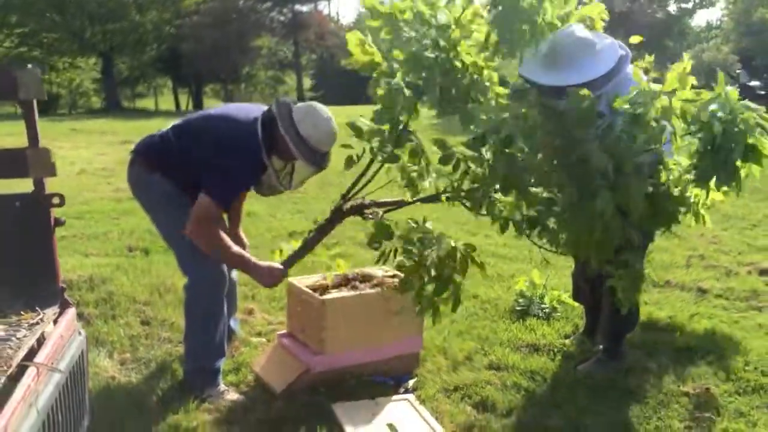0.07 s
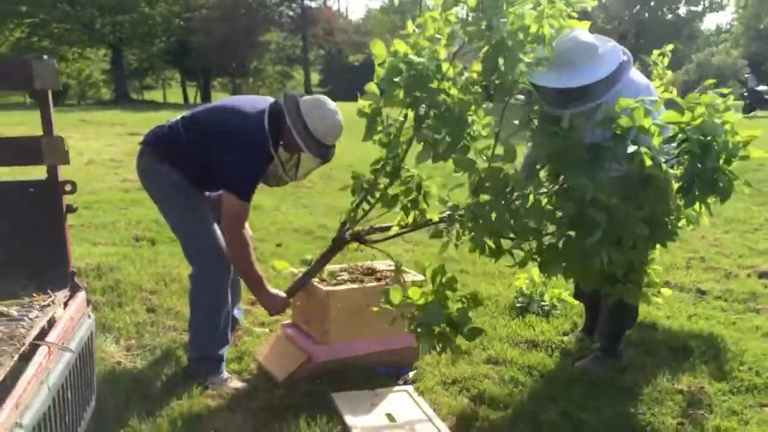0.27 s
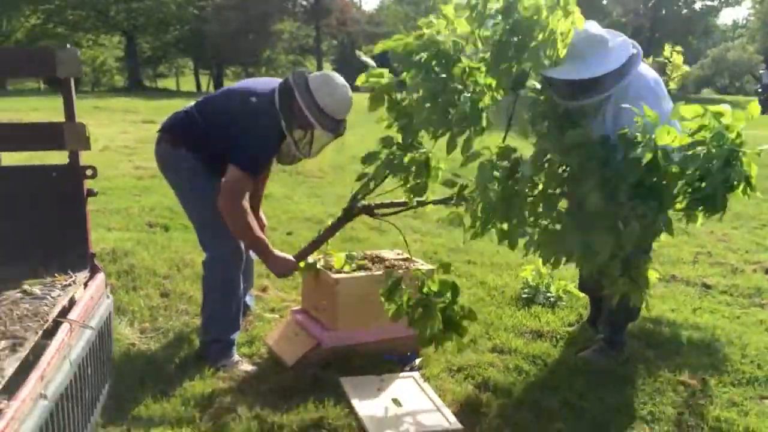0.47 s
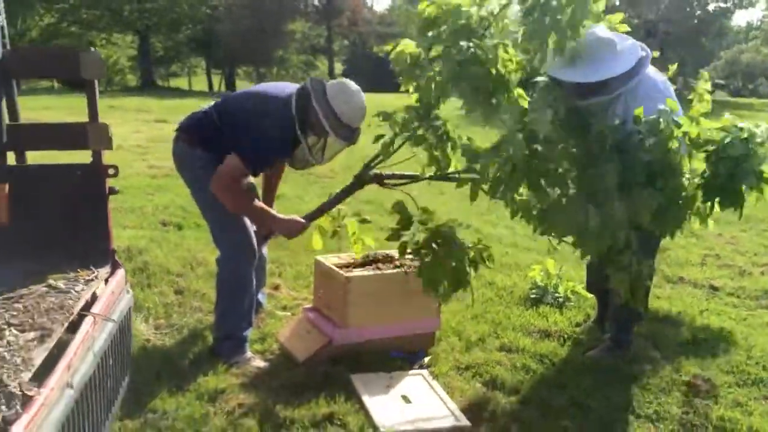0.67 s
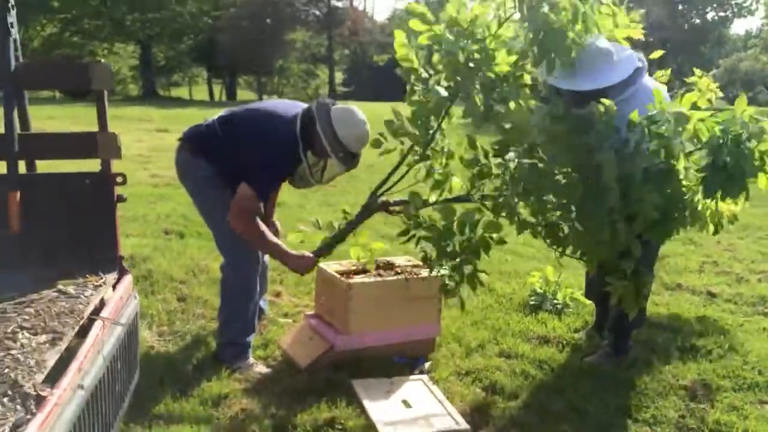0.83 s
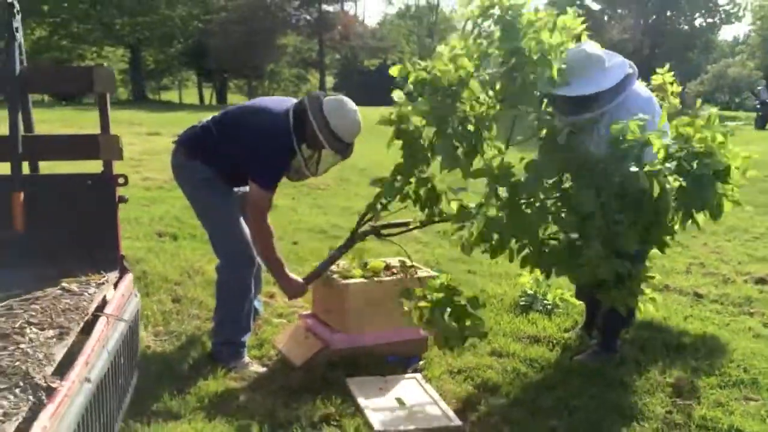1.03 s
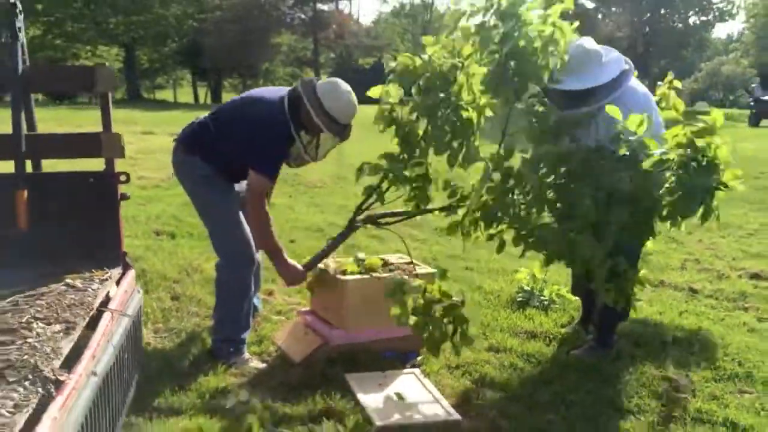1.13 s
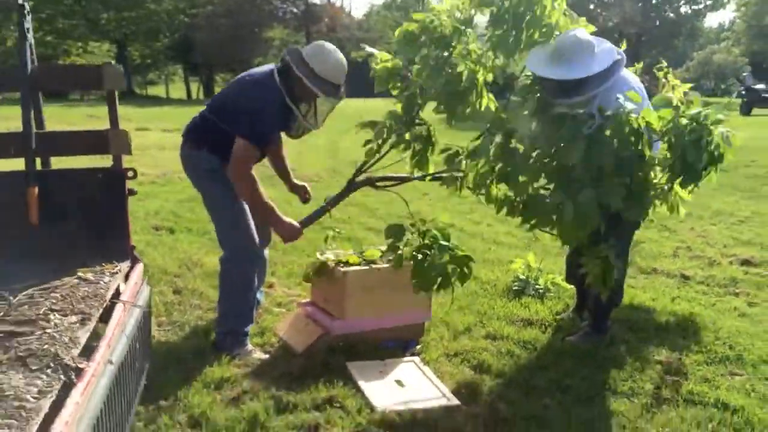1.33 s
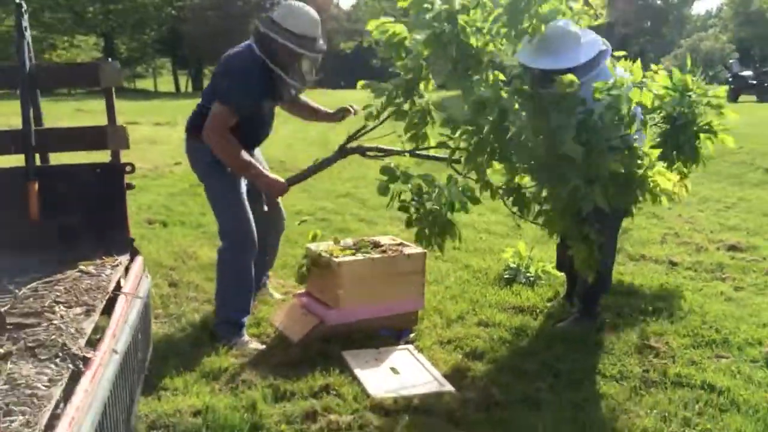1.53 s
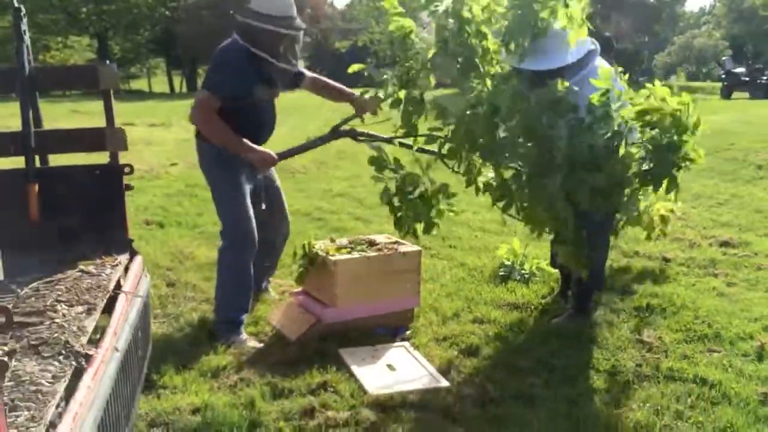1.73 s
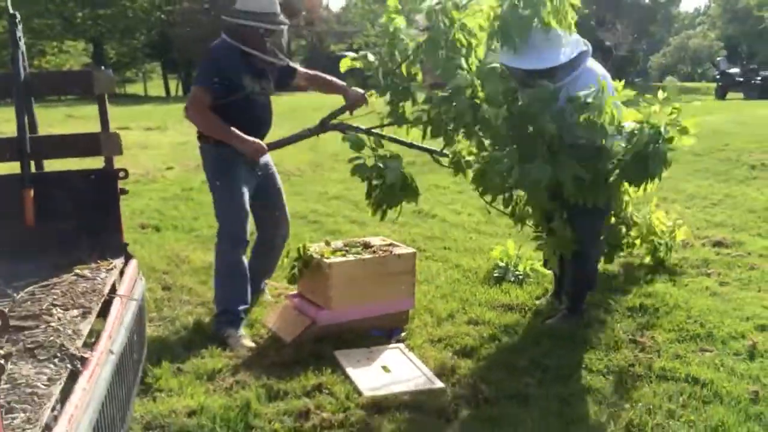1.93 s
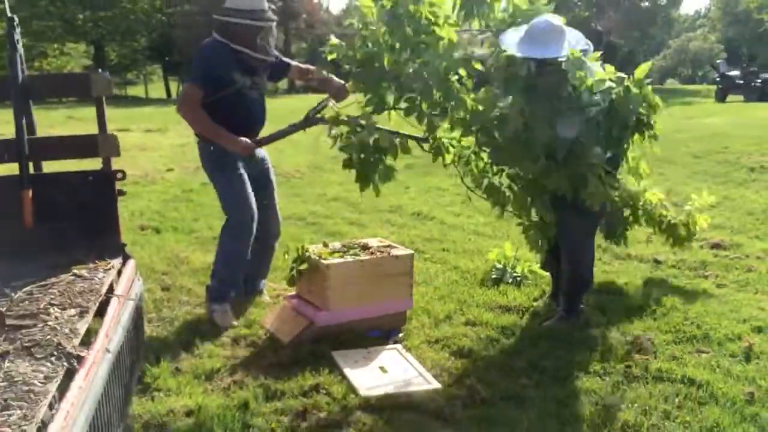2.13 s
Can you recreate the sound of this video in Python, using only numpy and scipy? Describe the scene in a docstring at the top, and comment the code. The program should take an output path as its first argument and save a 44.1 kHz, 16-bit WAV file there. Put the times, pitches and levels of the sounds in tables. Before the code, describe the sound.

Two loud hollow knocks of a branch on a wooden box, clipping, in quiet open air

```python
"""An open lawn: a leafy branch is knocked twice on a wooden hive box to shake a swarm off.
Each blow is shaped noise (tick, crack, clatter, leaves) over the ringing sine modes of the box.
The branch chatters and rings just after; a dull echo and a low scatter of noise return.
Around the blows: coloured noise for air, puffs of wind and twig ticks, and one gliding sine as a bird.
The blows overload the microphone, which clips them."""
import sys
import numpy as np
from scipy import signal
from scipy.fft import rfft, irfft
from scipy.io import wavfile
from scipy.ndimage import uniform_filter1d

SR = 44100
rng = np.random.default_rng(int(sys.argv[2]) if len(sys.argv) > 2 else 0)


def master_out(mix):
    """Clip the mix to full scale and print it as 16-bit PCM to the path in sys.argv[1]."""
    frames = np.transpose(np.atleast_2d(mix))
    ceiling = np.clip(frames, -1, 1)
    pcm = np.round(ceiling * 32767).astype(np.int16)
    wavfile.write(sys.argv[1], SR, pcm)


N = 97020
TIME = np.arange(N) / SR

# the two blows: start_s, thump_hz, boom_db, crack_db, clatter_db, leaves_db
KNOCKS = [(0.2464, 238.5, -1.5, -12.5, -12, -36), (0.9955, 237.7, 0.5, -10, -17, -37.5)]
# relative spectrum of loose wood rattling: pitch_hz, level_db (per Hz)
CLATTER_COLOUR = [(30, -8), (130, -45), (300, -2), (560, -5), (1050, -3.5), (1450, -11), (2200, -11),
                  (2900, -27.5), (4400, -26.5), (6000, -36), (15500, -50)]


def amp(db):
    """Decibels to gain."""
    return 10 ** (np.asarray(db) / 20)


def unit(x):
    """Scales to rms 1."""
    return x / np.sqrt(np.mean(x ** 2) + 1e-20)


def gains(points, hz):
    """Reads a spectrum on a log-frequency axis."""
    point_hz, point_db = np.transpose(points)
    return amp(np.interp(np.log(hz + 1), np.log(point_hz + 1), point_db))


def noise(points, grain_db=0):
    """Noise of a given colour and rms 1; uneven sample sizes make it gritty."""
    grain = amp(grain_db * np.minimum(rng.exponential(1, N), 5))
    white = rng.standard_normal(N) * grain
    colour = gains(points, np.fft.rfftfreq(N, 1 / SR))
    return unit(irfft(rfft(white) * colour, N))


def burst(start_s, rise_s, t60_s):
    """A linear rise, then an exponential decay of 60 dB in t60_s."""
    t = np.maximum(TIME - start_s, 0)
    rise = np.minimum(t / rise_s, 1)
    return rise * amp(-60 * np.maximum(t - rise_s, 0) / t60_s)


def swells(rows):
    """Bell-shaped swells (peak_s, level_db, bell width as one sigma in s), added in power."""
    power = 0
    for peak_s, level_db, width_s in rows:
        bell = np.exp(-((TIME - peak_s) / width_s) ** 2 / 2)
        power = power + (amp(level_db) * bell) ** 2
    return np.sqrt(power)


def band(x, low_hz, top_hz):
    """A gentle band-pass."""
    edges_hz = [low_hz, min(top_hz, .49 * SR)]
    return signal.sosfilt(signal.butter(2, edges_hz, "band", fs=SR, output="sos"), x)


def air():
    """Outdoor air: broad noise with faint patches drifting in time and pitch, and a slow level ride."""
    # relative spectrum of the air: pitch_hz, level_db (per Hz)
    air_colour = [(15, -40), (25, -22), (54, -3), (196, 0.5), (286, -10), (462, -9), (637, -15), (790, -10),
                  (1150, -13.5), (1580, -15.5), (2630, -22), (3090, -20.5), (5570, -24), (6900, -25),
                  (15000, -29.5)]
    # relative level of the background: time_s, level_db
    air_level = [(0, 2), (.3, -1), (.6, 0), (.9, 0.5), (1.24, -2.5), (1.36, 2), (1.55, 0), (1.75, -1),
                 (1.95, -1), (2.2, -3.5)]
    level_db, patch_db = -44.5, 1.5
    spectrum = signal.stft(noise(air_colour), nperseg=1024, noverlap=768)[2]
    patches = rng.standard_normal(spectrum.shape)
    for axis in (0, 1):  # smooth over pitch, then over time
        patches = uniform_filter1d(patches, size=20, axis=axis)
    patchy = spectrum * amp(patch_db * unit(patches))
    steady = unit(signal.istft(patchy, nperseg=1024, noverlap=768)[1][:N])
    ride = amp(np.interp(TIME, *np.transpose(air_level)))
    return amp(level_db) * steady * ride


def bird(bend=0.83):
    """One faint rising chirp, a gliding sine blurred by a decaying noise reverb from the trees."""
    start_s, length_s, level_db = .002, .1, -52
    from_hz, to_hz = 2720, 3330
    blur_db, blur_rise_s, blur_t60_s = 1, 0.017, 0.41
    progress = np.clip((TIME - start_s) / length_s, 0, 1)
    hz = from_hz + (to_hz - from_hz) * progress ** bend
    tone = np.sin(2 * np.pi * np.cumsum(hz) / SR)
    chirp = amp(level_db) * np.sin(np.pi * progress) ** 2 * tone
    trees = rng.standard_normal(N) * burst(0, blur_rise_s, blur_t60_s)
    blurred = signal.fftconvolve(chirp, trees / np.linalg.norm(trees))[:N]
    return chirp + amp(blur_db) * blurred


def wind():
    """Puffs of wind on the microphone: low rumbling noise in bell-shaped swells."""
    # relative spectrum of the rumble: pitch_hz, level_db (per Hz)
    wind_colour = [(20, -30), (45, -4.5), (65, 1.5), (100, -3), (150, -5.5), (250, -22.5), (400, -43),
                   (1500, -42), (15500, -94)]
    # puffs: peak_s, level_db, width_s (one sigma)
    puffs = [(0.185, -43, 0.033), (1.2, -50.5, 0.056), (1.362, -38.5, 0.017), (1.43, -36.5, 0.03),
             (1.58, -49, 0.1), (2.022, -34, 0.0076), (2.076, -22, 0.02), (2.125, -35, 0.02),
             (2.19, -23.5, 0.014)]
    return noise(wind_colour) * swells(puffs)


def leaves():
    """Bright noise: leaves shiver after each blow and rustle as the branch is swung and lifted."""
    # relative spectrum of the leaves: pitch_hz, level_db (per Hz)
    leaf_colour = [(100, -2), (1000, 13), (2300, 8.5), (4200, 9.5), (7000, 5), (11000, 4), (15500, 5)]
    # rustles of the moving branch: peak_s, level_db, width_s (one sigma)
    rustles = [(0.21, -50.5, 0.053), (0.63, -50, 0.073), (0.985, -44, 0.011), (1.34, -48.5, 0.024),
               (1.435, -48.5, 0.019), (2.1, -46.5, 0.091)]
    rise_s, t60_s = .004, 0.7
    shiver = sum(amp(leaves_db) * burst(start_s, rise_s, t60_s) for start_s, *_, leaves_db in KNOCKS)
    return noise(leaf_colour, grain_db=2.5) * np.hypot(shiver, swells(rustles))


def boom(start_s, thump_hz, place):
    """The box flexes for a few heavy cycles and its modes ring; low ones take longer to build up."""
    # modes of the box struck at two places: pitch_hz, t60_s, first_knock_db, second_knock_db
    box_modes = [(95, .06, -11, -38), (180, 0.081, 1, -6), (203.1, 0.14, 1, -7.5), (245.7, 0.072, -1, -1),
                 (324, 0.047, -32.5, -5.5), (354.5, 0.062, -2, -9.5), (488, 0.1, -11, -16),
                 (740.5, 0.15, -17.5, -15.5), (813.4, 0.041, -32, -5), (1044, 0.12, -24, -14.5),
                 (1245, 0.11, -17.5, -22), (1620, 0.076, -20, -28), (1731, 0.07, -15, -34),
                 (1872, 0.067, -19, -22.5)]
    rise_s, contact_cycles = 0.0021, 0.59
    low_db, low_hz, low_fade_s, low_lead_s = -2.5, 173, 0.0041, .001
    thump_db, thump_delay_s, thump_width_s = -2.5, 0.0068, 0.0024
    t = TIME - start_s
    # a short low swell around the moment of contact
    low_envelope = np.exp(-abs(t + low_lead_s) / low_fade_s)
    low_swell = amp(low_db) * low_envelope * np.sin(2 * np.pi * low_hz * t)
    # the first heavy flex of the box
    flex = swells([(start_s + thump_delay_s, thump_db, thump_width_s)])
    out = low_swell + flex * np.sin(2 * np.pi * thump_hz * t)
    for hz, t60_s, *levels_db in box_modes:
        ring = burst(start_s, rise_s + contact_cycles / hz, t60_s)
        out += amp(levels_db[place]) * ring * np.sin(2 * np.pi * hz * t)
    return out


def knocks():
    """Each blow: a bright tick of bark, a crack, the boom of the box and a clatter of loose wood."""
    # relative spectrum of the bark tick: pitch_hz, level_db (per Hz)
    tick_colour = [(100, -15), (1500, -13), (3400, 4), (5000, -4.5), (6500, -1.5), (10000, -9),
                   (15500, -22)]
    # relative spectrum of the crack: pitch_hz, level_db (per Hz)
    crack_colour = [(100, -25), (500, 3.5), (1200, 2.5), (2100, 10), (3000, -28), (4700, 1), (6000, -14.5),
                    (10000, -21), (15500, -34)]
    tick_db, tick_lead_s, tick_rise_s, tick_t60_s = -19, 0.00203, 0.00037, 0.018
    crack_lead_s, crack_rise_s, crack_t60_s = 0.00096, .0012, 0.024
    clatter_rise_s, clatter_t60_s = 0.0083, 0.13
    tick, crack = noise(tick_colour), noise(crack_colour)
    clatter = noise(CLATTER_COLOUR, grain_db=2)
    out = np.zeros(N)
    for place, (start_s, thump_hz, boom_db, crack_db, clatter_db, _) in enumerate(KNOCKS):
        out += amp(tick_db) * tick * burst(start_s - tick_lead_s, tick_rise_s, tick_t60_s)
        out += amp(crack_db) * crack * burst(start_s - crack_lead_s, crack_rise_s, crack_t60_s)
        out += amp(boom_db) * boom(start_s, thump_hz, place)
        out += amp(clatter_db) * clatter * burst(start_s, clatter_rise_s, clatter_t60_s)
    return out


def rebounds(rise_s=0.00047):
    """The branch chatters on the rim of the box just after each blow, and its own modes ring."""
    # landings of the branch: start_s, clatter_db, bark_snap_db, branch_ring_db
    landings = [(0.2623, -18.5, -24.5, -44), (0.2704, -16, -21.5, -34), (1.0176, -21, -16.5, -23),
                (1.0227, -24.5, -43, -41)]
    # relative spectrum of the bark snap: pitch_hz, level_db (per Hz)
    snap_colour = [(200, -5), (1200, 13.5), (2400, 0), (2900, -6), (3480, 1), (3750, -1.5), (4500, -5),
                   (5500, -11.5), (9000, -17.5), (15500, -43)]
    # modes of the branch: pitch_hz, t60_s, level_db
    branch_modes = [(2620, 0.052, 1), (3490, 0.056, 2.5), (4080, 0.05, -7), (4523, 0.024, -13)]
    clatter_t60_s, snap_t60_s = 0.054, 0.075
    clatter = noise(CLATTER_COLOUR, grain_db=-1)
    snap = noise(snap_colour, grain_db=2)
    out = np.zeros(N)
    for start_s, clatter_db, snap_db, ring_db in landings:
        out += amp(clatter_db) * clatter * burst(start_s, rise_s, clatter_t60_s)
        out += amp(snap_db) * snap * burst(start_s, rise_s, snap_t60_s)
        for hz, t60_s, mode_db in branch_modes:
            tone = np.sin(2 * np.pi * hz * (TIME - start_s))
            out += amp(ring_db + mode_db) * burst(start_s, rise_s, t60_s) * tone
    return out


def yard():
    """One dull, smeared echo of each blow and a short, low scatter from the surroundings."""
    # relative spectrum of the echo: pitch_hz, level_db (per Hz)
    echo_colour = [(100, -18), (300, 11), (600, -4), (1300, -3), (2000, -10), (2800, -33), (15500, -45)]
    # relative spectrum of the scatter: pitch_hz, level_db (per Hz)
    scatter_colour = [(30, -30), (110, -1.5), (200, 8), (450, -3.5), (1100, -16), (2200, -26), (5000, -31),
                      (15500, -60)]
    echo_delay_s, echo_db, echo_rise_s, echo_t60_s = 0.0685, -26.5, 0.0059, 0.082
    scatter_db, scatter_rise_s, scatter_t60_s = -26, 0.058, 0.21
    starts_s = [start_s for start_s, *_ in KNOCKS]
    echo = noise(echo_colour) * sum(burst(s + echo_delay_s, echo_rise_s, echo_t60_s) for s in starts_s)
    scatter = noise(scatter_colour) * sum(burst(s, scatter_rise_s, scatter_t60_s) for s in starts_s)
    return amp(echo_db) * echo + amp(scatter_db) * scatter


def twigs(rise_s=0.00099, spread=0.085, dry_db=-9):
    """Small ticks: each a burst of noise with one band standing out and some white noise beneath."""
    # ticks: start_s, level_db, pitch_hz, t60_s
    twig_ticks = [(0.831, -35, 6820, 0.013), (1.764, -43, 1565, 0.082), (2.0218, -34, 2350, 0.018)]
    white = rng.standard_normal(N)
    out = np.zeros(N)
    for start_s, level_db, hz, t60_s in twig_ticks:
        resonance = unit(band(white, hz * (1 - spread), hz * (1 + spread)))
        grit = amp(dry_db) * white
        out += amp(level_db) * (resonance + grit) * burst(start_s, rise_s, t60_s)
    return out


def scene():
    """The blows in the yard, over air, bird, leaves, twigs and wind, as one channel."""
    background = air() + bird() + wind()
    blows = leaves() + knocks() + rebounds() + yard()
    return (background + blows + twigs())[None]


def record(dry):
    """The microphone clips whatever passes full scale; then a steep low-pass limits the treble."""
    drive_db, edge_hz = -0.5, 15600
    clipped = np.clip(dry * amp(drive_db), -1, 1)
    low_pass = signal.firwin(511, edge_hz, window=("kaiser", 9), fs=SR)
    return signal.oaconvolve(clipped, low_pass[None], "same")


dry = scene()
out = record(dry)
master_out(out)
```